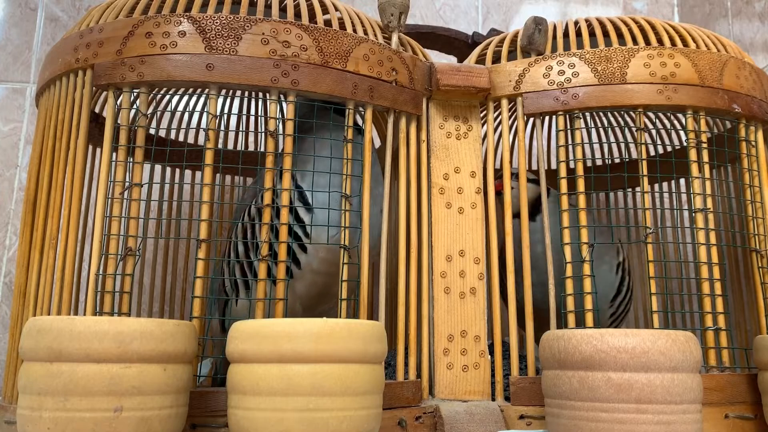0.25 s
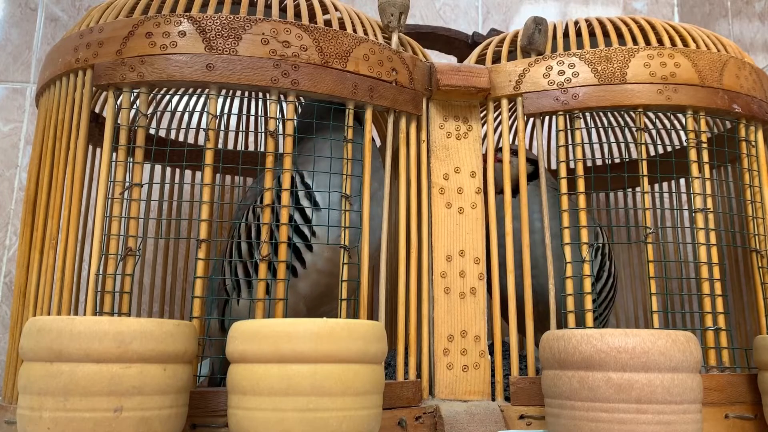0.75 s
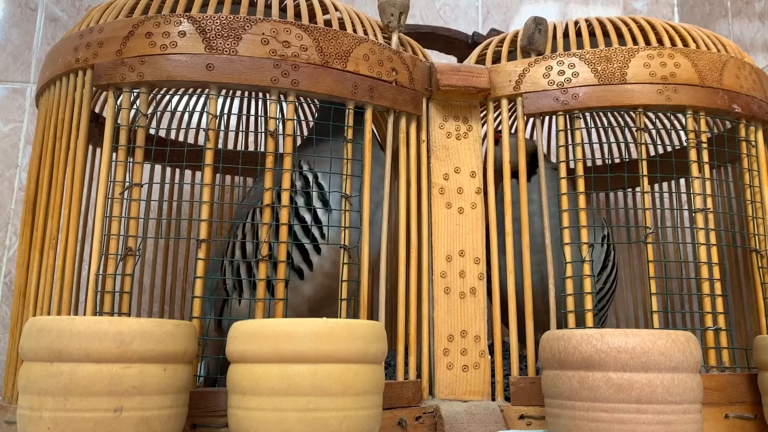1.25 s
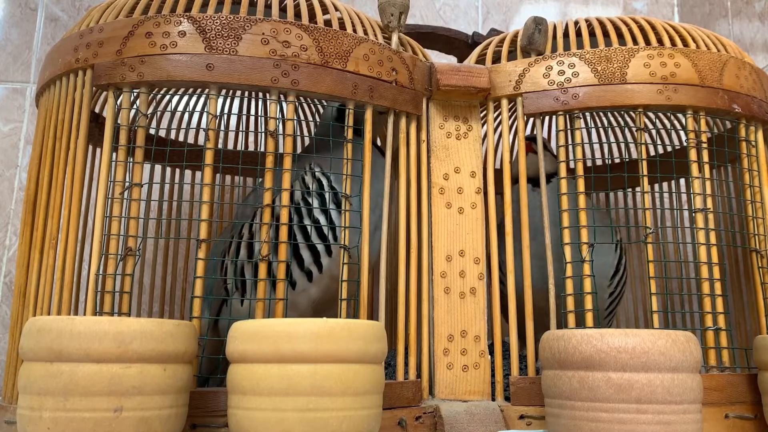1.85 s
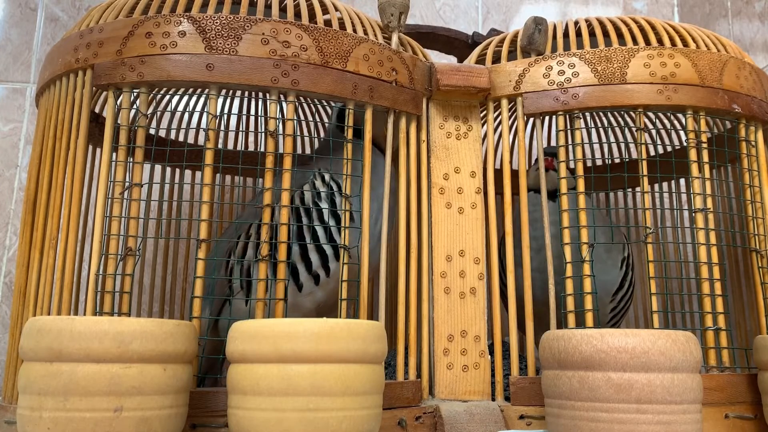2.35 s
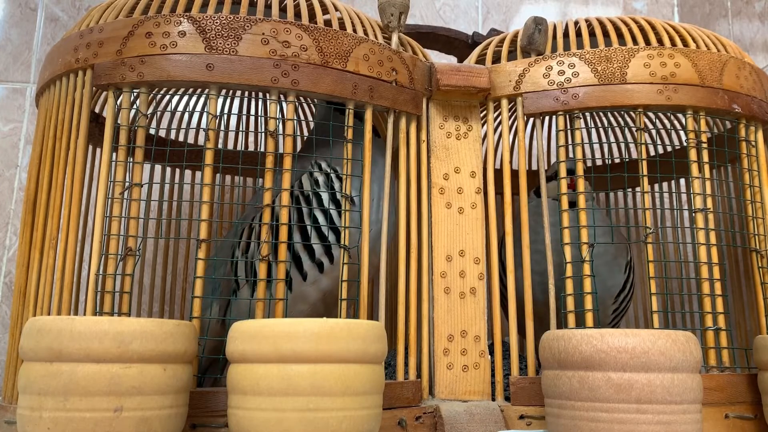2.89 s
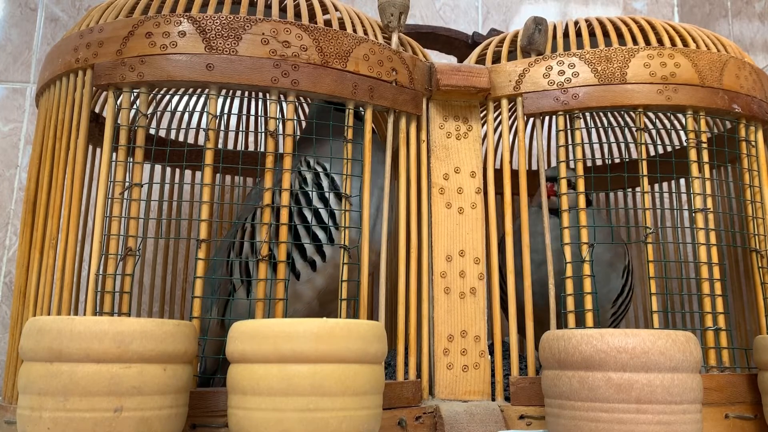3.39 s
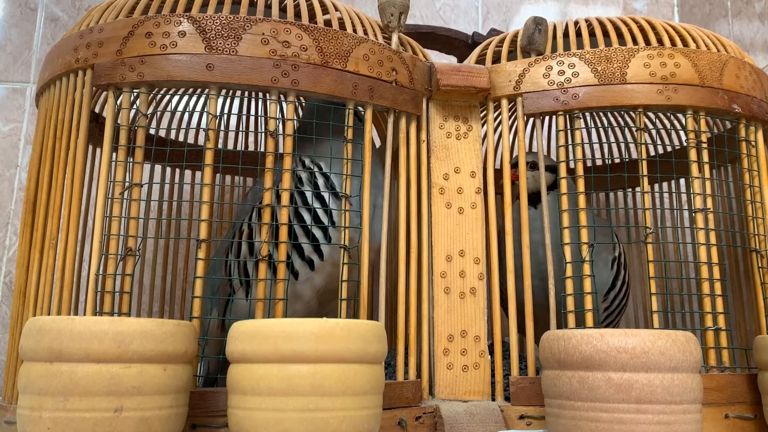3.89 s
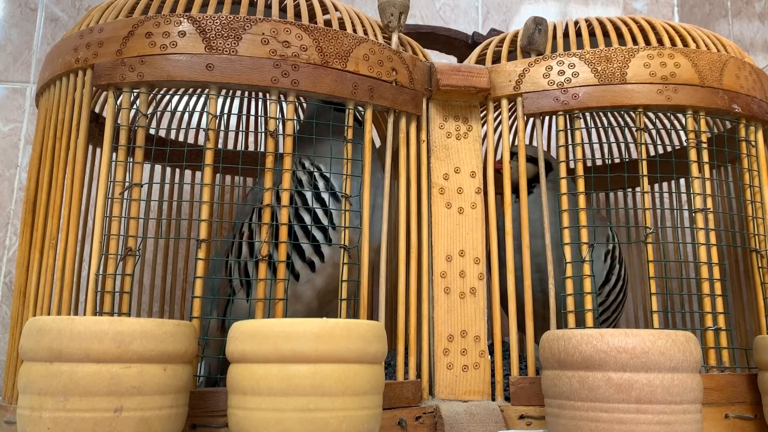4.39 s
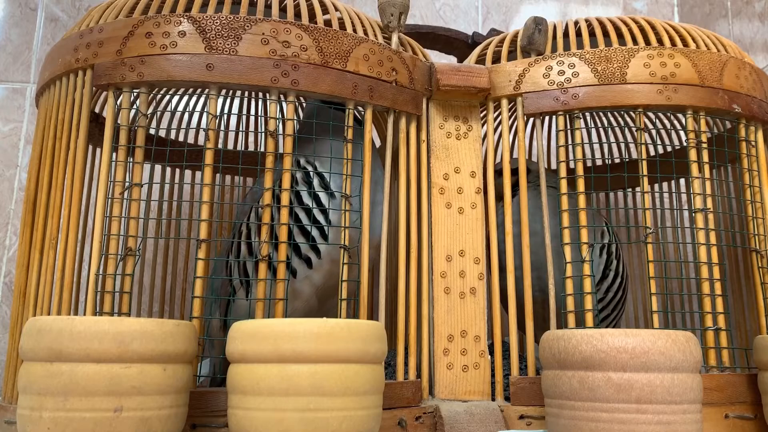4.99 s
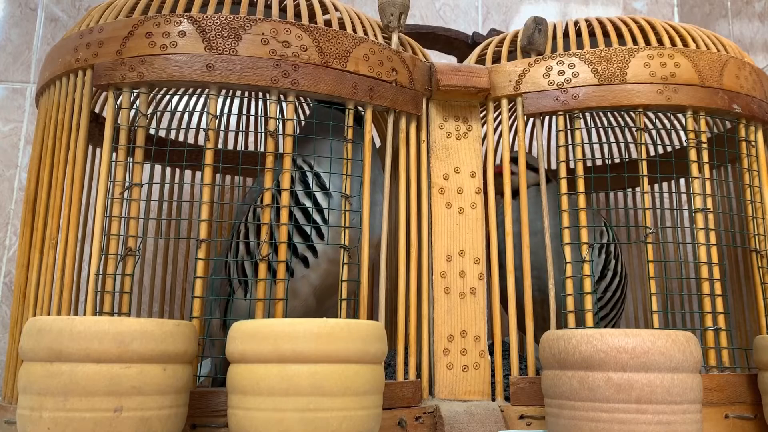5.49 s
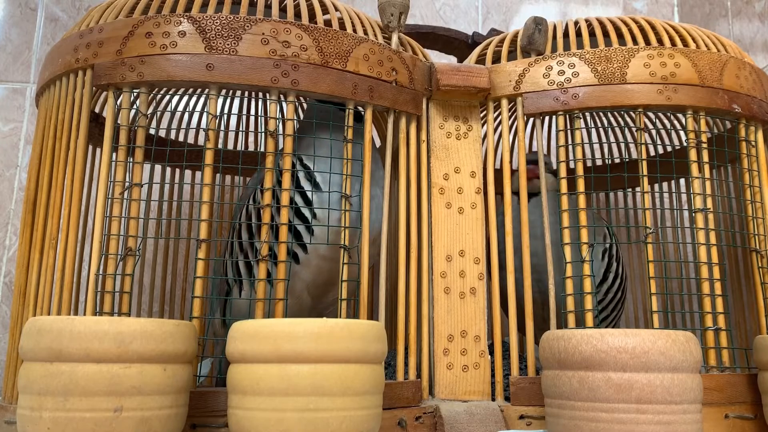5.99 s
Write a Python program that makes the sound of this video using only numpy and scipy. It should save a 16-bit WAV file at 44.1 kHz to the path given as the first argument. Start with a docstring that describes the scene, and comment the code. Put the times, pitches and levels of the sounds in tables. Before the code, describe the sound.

From the very start a caged partridge clucks close to the microphone, hoarse and nasal, five to six notes a second, with no real pause through about 6.25 seconds. Each cluck is one to a few quick throbs with woody, beaky resonance, often closing on a short low note that slides down. A second partridge gives near-clean, quavering short tones, most often in the first two seconds, then around 3.7, 5.25 and 5.6. A soft low knock comes at 0.25 and another at 2.0. Around 1.9 to 2.1 a ladder of clear pips climbs into a stronger cluck, and the calling grows louder. More pip runs come near 2.7, 4.3, 4.95 and, most densely, 5.8. From about 3.8 the breathy hiss is brighter as the head faces nearer. A hard-walled room rings after every note, over very faint low rumble.

```python
"""Hoarse clucks come first, five to six a second: throbbing pulse trains ring in throat and beak modes,
with a rush of coloured noise and often a falling low note; short clear pips climb into some or open them.
A second caged partridge answers in near-clean tones. Both are indoors, close to a two-port microphone.
A hard-walled room rings after them as decaying noise; low noise and two soft sine knocks lie underneath."""
import sys
import numpy as np
from scipy import signal
from scipy.fft import rfft, irfft, next_fast_len
from scipy.io import wavfile
from scipy.ndimage import uniform_filter1d, map_coordinates

SR = 44100
rng = np.random.default_rng(int(sys.argv[2]) if len(sys.argv) > 2 else 0)


def log_audio(samples):
    """Write samples as a 16-bit WAV file to the path given in sys.argv[1]."""
    # one column per channel
    frames = np.atleast_2d(samples).T
    # limit to full scale, then quantise
    limited = np.clip(frames, -1, 1)
    pcm = np.round(limited * 32767).astype(np.int16)
    wavfile.write(sys.argv[1], SR, pcm)


N = 275625


def amp(db):
    """Amplitude of a level in dB; amp(2 * db) is its power."""
    return 10 ** (np.asarray(db) / 20)


def unit(x):
    """Scales to rms 1."""
    return x / np.sqrt(np.mean(x ** 2) + 1e-20)


def along(points, hz):
    """Interpolates (hz, value) points on a log frequency axis."""
    f, v = np.transpose(points)
    return np.interp(np.log(hz + 1), np.log(f + 1), v)


def over_time(points):
    """Interpolates (time_s, value) points at every sample."""
    return np.interp(np.arange(N) / SR, *np.transpose(points))


def wobble(knots_per_s):
    """Smooth random curve through normal knots."""
    knots = rng.standard_normal(int(N * knots_per_s / SR) + 4)
    return map_coordinates(knots, [np.arange(N) * knots_per_s / SR])


def filtered(x, response):
    """Multiplies the spectrum by a response of frequency."""
    m = next_fast_len(N + SR // 2)
    return irfft(rfft(x, m) * response(np.fft.rfftfreq(m, 1 / SR)), m)[..., :N]


def modes(table):
    """Causal response of (hz, width_hz, level_db) resonances, alternating in sign."""
    def response(f):
        total = 0
        for k, (c, width, db) in enumerate(table):
            total = total + (-1) ** k * amp(db) * 1j * f * width / (c * c - f * f + 1j * f * width)
        return total
    return response


def noise(spectrum):
    """Gaussian noise coloured by (hz, level_db) points, rms 1."""
    return unit(filtered(rng.standard_normal(N), lambda hz: amp(along(spectrum, hz))))


def add(track, start_s, sound):
    """Mixes a sound into the track in place."""
    part = track[max(round(start_s * SR), 0):][:len(sound)]
    part += sound[:len(part)]


def swell(hold_s, rise, fall):
    """Time axis and envelope: fast rise, hold, exponential decay (rise and fall in s)."""
    t = np.arange(int((abs(hold_s) + 6 * fall) * SR)) / SR
    return t, (1 - np.exp(-(t / rise) ** 2)) * np.exp(-np.maximum(t - hold_s, 0) / fall)


# low noise levels: time_s, deep_db, hum_db (hum before an 8 dB cut)
RUMBLE_LEVELS = [(0.0, -68.5, -68), (1.781, -75.5, -70), (2.909, -67, -62), (6.25, -68.5, -71.5)]
# deep noise spectrum: hz, relative_db_per_hz
DEEP_SPECTRUM = [(20, -22), (40, 4), (60, 4), (90, 2.5), (110, -5), (140, -60.5)]


def rumble():
    """Wavering deep noise of the building and a narrow-band hum, nearly alike at both ports; faint air murmur."""
    time_s, deep_db, hum_db = np.transpose(RUMBLE_LEVELS)
    t = np.arange(N) / SR
    hum = noise([(75, -52.0), (90, -12.5), (96, 9.5), (104, -4.5), (120, -39.5)])
    waver = amp(1.5 * wobble(5))
    deep = amp(np.interp(t, time_s, deep_db)) * waver * noise(DEEP_SPECTRUM)
    shared = deep + amp(np.interp(t, time_s, hum_db) - 8.0) * hum
    air = [(30, -15.5), (70, -6.5), (130, -8.5), (250, -5.0),
           (1500, -12.0), (3000, -49.5), (6000, -71.5), (16000, -75)]
    return shared + amp(-75.0) * noise(air) + amp(-69.0) * np.array([noise(air), noise(air)])


# knocks: start_s, level_db, pitch_hz, t60_s
KNOCK_EVENTS = [(0.251, -55.5, 199, 0.2), (2.016, -56, 202, 0.17)]


def knocks():
    """Soft feet on the cage floor: decaying low sines with a softened onset."""
    out, t = np.zeros(N), np.arange(SR // 3) / SR
    for start_s, db, hz, t60_s in KNOCK_EVENTS:
        envelope = amp(db - 60 * t / t60_s) * (1 - np.exp(-t / 0.0039))
        add(out, start_s, envelope * np.sin(2 * np.pi * hz * t))
    return out


# phase between ports, from paths through the bars: hz, left_lead_rad
PORT_LEAD = [(300, 0), (355, 0), (395, 2.9), (460, 2.5), (620, 2), (700, .6), (850, 1.6), (1080, .7),
             (1130, 3.1), (1210, 3.9), (1280, 6.8), (1410, 7.1), (1480, 8.3), (1570, 9.9), (1800, 9.3),
             (1950, 12.4), (2150, 12.2), (2550, 12.4), (2800, 9.8), (4570, 12.6), (6300, 6.3),
             (15900, -6.3)]
# level between ports: hz, left_minus_right_db
PORT_TILT = [(380, -1.5), (700, 1), (2400, .4), (4400, 2), (8000, 0)]


def ports(x):
    """Splits a mono sound to two ports, half the phase lead and level difference to each side."""
    side = np.array([[.5], [-.5]])

    def response(hz):
        lead_rad = np.interp(hz, *np.transpose(PORT_LEAD))
        return amp(side * along(PORT_TILT, hz)) * np.exp(1j * side * lead_rad)
    return filtered(x, response)


# room decay: hz, t60_s
ROOM_DECAY = [(300, 0.64), (800, 0.89), (1400, 0.3), (2200, 0.92), (3000, 0.87), (6500, 0.5), (10000, 0.36),
              (15000, .21)]
# room power common to both ports: hz, share_0_to_1
ROOM_ALIKE = [(300, .8), (1000, .5), (1450, .35), (2000, .1), (6000, .1), (9000, .8)]
BARS_DB, BARS_T60_S = 5, .035  # quick scatter off the cage bars, relative to the room's start


def room(x):
    """Noise tails decay at each band's own t60; as the birds move, overlapping stretches get new tails."""
    out, size = np.zeros((3, N + 2 * SR)), SR // 4
    x = np.pad(x, (size, 0))
    for start in range(0, N + size, size):
        hz, t, z = signal.stft(rng.standard_normal((3, SR // 2)), SR, nperseg=256)
        wall_decay = amp(-60 * t / along(ROOM_DECAY, hz)[:, None])
        bar_decay = amp(BARS_DB - 60 * t / BARS_T60_S)
        tail = signal.istft(z * (wall_decay + bar_decay), SR, nperseg=256)[1]
        part = x[start:start + 2 * size]
        windowed = part * np.hanning(2 * size)[:len(part)]
        wet = signal.fftconvolve(windowed[None], tail / 60, axes=1)
        out[:, start + 250:][:, :wet.shape[1]] += wet  # 250 samples of delay
    out = out[:, size:size + N]
    share = lambda hz: np.clip(along(ROOM_ALIKE, hz), 0, 1)
    common = filtered(out[0], lambda hz: np.sqrt(share(hz)))
    separate = filtered(out[1:], lambda hz: np.sqrt(1 - share(hz)))
    return ports(common) + separate


# second bird: start_s, peak_after_s, length_s, first_hz, last_hz, level_db, air_db
ANSWER_NOTES = [(0.047, 0.028, 0.037, 660, 655, -32, -42), (0.139, 0.018, 0.048, 641, 604.7, -27.5, -44.5),
                (0.581, 0.041, 0.063, 677, 697, -31, -43.5), (0.788, 0.015, 0.042, 559, 552.4, -33, -57.5),
                (1.105, 0.02, 0.07, 679, 649, -33, -49), (1.324, 0.011, 0.051, 621, 530, -28.5, -54),
                (1.349, .04, 0.13, 722.4, 708.5, -34, -44.5), (1.906, 0.016, 0.034, 698.4, 724, -35.5, -65),
                (3.711, 0.013, 0.075, 638, 593, -30.5, -64), (5.249, 0.034, 0.069, 794, 667.5, -31, -52.5),
                (5.608, 0.0064, .08, 832.6, 498.7, -30.5, -61.5)]
# partials of its notes: multiple, level_db
ANSWER_PARTIALS = [(1, -2), (2, 4), (3, -21), (4, -33)]
ANSWER_RISE_DB, ANSWER_FADE_DB = 9.5, 6.5  # below the peak at start and end


def answers():
    """Near-clean harmonic tones, gliding in pitch, quavering in pitch and strength."""
    out = np.zeros(N)
    quaver, tremble_db = .025 * wobble(110), 3 * wobble(70)
    for start_s, peak_s, length_s, first_hz, last_hz, db, _ in ANSWER_NOTES:
        t = np.arange(0, length_s, 1 / SR)
        at = ((start_s + t) * SR).astype(int)
        glide_hz = first_hz + (last_hz - first_hz) * t / length_s
        phase = 2 * np.pi * np.cumsum(glide_hz * (1 + quaver[at])) / SR
        edge = np.clip(np.minimum(t, length_s - t) / 0.0077, 0, 1)
        tone = sum(amp(level) * np.sin(k * phase) for k, level in ANSWER_PARTIALS)
        shape_db = np.interp(t, [0, peak_s, length_s], [-ANSWER_RISE_DB, 0, -ANSWER_FADE_DB])
        add(out, start_s, edge * amp(db + shape_db + tremble_db[at]) * tone)
    return out


# pips: start_s, level_db (1.5 dB added in play), second_partial_hz, upper_partial_relative_db
PIP_NOTES = [(0.474, -29, 672, -17), (0.911, -30.5, 1033, -19), (0.94, -27.5, 998, -29),
             (1.164, -32, 670, -5), (1.358, -24.5, 1024, -4.5), (1.516, -24, 686, -3.5),
             (1.706, -25.5, 702, 0.5), (1.925, -25, 713, -19.5), (1.955, -30, 727, -12.5),
             (1.976, -36.5, 710, -6), (2.018, -28.5, 699, -3), (2.026, -29.5, 1011, -18),
             (2.046, -28.5, 656, -7), (2.068, -24.5, 718, -13.5), (2.088, -28.5, 989, -9),
             (2.107, -19.5, 995, -25), (2.652, -27.5, 712, -12), (2.682, -27.5, 744, -9.5),
             (2.706, -26.5, 695, -12.5), (2.727, -22, 969, -14), (3.25, -26.5, 711, -3),
             (3.273, -27, 986, -21), (3.49, -30.5, 659, -9), (4.182, -27, 659, -9),
             (4.318, -26, 678, -12.5), (4.347, -26, 1013, -13.5), (4.935, -24.5, 708, -14),
             (4.964, -29.5, 694, -6.5), (4.99, -22, 899, -19), (5.013, -23, 948, -11.5),
             (5.204, -39.5, 706, 7.5), (5.338, -26, 712, -10), (5.381, -17, 976, -13),
             (5.757, -26.5, 1009, -25.5), (5.76, -33, 703, 4.5), (5.793, -25, 802, -8),
             (5.82, -20.5, 967, -10.5), (5.842, -19.5, 1000, -18.5), (5.865, -22, 939, -5.5),
             (5.881, -23, 905, -19), (6.236, -24, 918, -10)]
PIP_RISE_S, PIP_HOLD_S, PIP_FALL_S = 0.0067, 0.0087, 0.0034
PIP_SAG = 0.017  # share of pitch lost over the hold
RING_HZ = 1400  # the beak favours the partial nearest to this


def pips():
    """Each pip is a brief sagging tone plus one upper partial that rings in the beak."""
    out = np.zeros(N)
    t, shape = swell(PIP_HOLD_S, rise=PIP_RISE_S, fall=PIP_FALL_S)
    sagging_t = t + PIP_SAG * t * (1 - t / (2 * PIP_HOLD_S))
    phases = rng.standard_normal(size=(len(PIP_NOTES), 2))
    for (start_s, db, hz, ring_db), (tone_rad, ring_rad) in zip(PIP_NOTES, phases):
        phase = 2 * np.pi * hz * sagging_t + tone_rad
        ratio = round(2 * RING_HZ / hz) / 2  # halves, as hz is the second partial
        tone = np.sin(phase) + amp(ring_db) * np.sin(ratio * phase + ring_rad)
        add(out, start_s - .007, amp(db + 1.5) * shape * tone)
    return out


# clucks: first_throb_s, span_to_last_throb_s, first_db, last_db, chest_share_db, tip_first_db, tip_last_db,
# air_db, low_note_db (-70 = none)
CLUCK_CALLS = [(.007, .0052, -36, -33, -8, 6, 2, -64, -51.5),
               (.105, .026, -26, -25, -14.5, -3.5, -0.5, -50, -51),
               (.274, .05, -27.5, -28, -9, 2, 3, -46.5, -40.5),
               (.481, .018, -26, -23.5, -13, 0, 0, -50.5, -41),
               (.649, .024, -21, -28, -13, -1, 2.5, -48.5, -42),
               (0.813, 0.028, -28, -30, -8.5, 6.5, -4, -50, -70),
               (.978, .052, -30.5, -27.5, -9.5, 0, -2, -50.5, -41),
               (1.171, .029, -21, -27, -8, 1.5, 7, -41.5, -40),
               (1.332, 0.0099, -27, -30, -8, -9, -8, -44.5, -70),
               (1.446, .033, -31, -29.5, -8, 1.5, -0.5, -52.5, -70),
               (1.523, .044, -27, -28.5, -10, 5, 0, -42, -41.5),
               (1.718, .054, -23.5, -30.5, -9.5, 1, 3, -44, -43),
               (1.909, 0.016, -27, -29, -3.5, -2.5, -4, -45.5, -70),
               (2.137, .022, -17.5, -19.5, -13.5, -7.5, 0.5, -39.5, -42),
               (2.313, .024, -29.5, -24, -21, 3.5, 5, -39.5, -70),
               (2.368, .028, -24, -21, -9.5, 0.5, 0, -40, -44),
               (2.541, .014, -23, -23.5, -6, -6.5, -10.5, -43.5, -54),
               (2.758, .022, -18, -24.5, -23.5, -3.5, 2.5, -39, -43.5),
               (2.938, .033, -24, -24, -11, 2.5, 2.5, -46, -39),
               (3.121, .021, -18.5, -19, -14.5, -11, -3, -45.5, -48),
               (3.307, .026, -21.5, -18, -13.5, -13, -4, -43, -40),
               (3.497, .058, -19, -25.5, -15, 0, 3, -41.5, -37.5),
               (3.702, .027, -17, -26, -13, -5, -2.5, -42.5, -49),
               (3.811, .028, -27.5, -23, -10.5, -4, 6, -36, -39),
               (4.013, .026, -25, -23, -13, 0.5, 1.5, -37.5, -39.5),
               (4.189, .034, -21, -29, -9, -1.5, 5, -43, -50),
               (4.382, .046, -20.5, -19.5, -13, -1.5, 3, -38, -38.5),
               (4.586, .083, -21.5, -23.5, -20.5, 5, 4, -41, -40.5),
               (4.812, .018, -16.5, -22.5, -10, -3, -3.5, -43, -54.5),
               (5.033, .045, -26.5, -18, -20.5, 5, -5, -38.5, -37.5),
               (5.234, 0.017, -26, -25.5, -22.5, -3, 3, -44.5, -70),
               (5.408, .05, -24.5, -17.5, -22, 8.5, -8, -40, -45.5),
               (5.617, .025, -28, -29, -26.5, 3.5, 6, -41, -70),
               (5.886, .046, -27, -17.5, -14, 8, -1.5, -32, -38.5),
               (6.106, .022, -27, -22.5, -8, 5.5, 2, -37.5, -43),
               (6.246, .0088, -36.5, -36, -4, -0.5, 0, -54, -70)]
# soft throbs before some clucks: first_throb_s, span_to_last_throb_s, first_db, last_db, air_db
LEAD_IN_CALLS = [(0.916, 0.082, -40, -27.5, -61.5), (2.029, .088, -42.5, -31, -60),
                 (2.655, 0.085, -41.5, -29.5, -58), (4.324, 0.044, -31.5, -32, -55),
                 (4.937, 0.08, -38.5, -35.5, -64), (5.766, 0.1, -42, -31.5, -52.5)]
THROAT_DB = -9.5  # throat share in a cluck
LEAD_CHEST_DB, LEAD_THROAT_DB = (-6.5, -3), (-1.5, -8.5)  # lead-in shares at first and last throb
LEAD_TIP_DB = 3.5


def trains():
    """Lists calls: start_s, span_s, then (first, last) dB of level, chest share, throat share, tip mode."""
    calls = []
    for s, span, first, last, chest, tip_first, tip_last, *_ in CLUCK_CALLS:
        calls.append((s, span, (first, last), (chest, chest), (THROAT_DB, THROAT_DB), (tip_first, tip_last)))
    for s, span, first, last, _ in LEAD_IN_CALLS:
        calls.append((s, span, (first, last), LEAD_CHEST_DB, LEAD_THROAT_DB, (LEAD_TIP_DB, LEAD_TIP_DB)))
    return calls


FALL_EARLY_S, FALL_S = .024, 0.041  # low note: lead on the last throb, nominal length


def low_notes():
    """(start_s, level_db) of the falling low note that closes most clucks."""
    return [(max(s + max(span - FALL_EARLY_S, 0), 0), db) for s, span, *_, db in CLUCK_CALLS if db > -65]


REST_HZ, TENSE_HZ = 321, 484.9  # pitch with slack and with fully tight membranes


def pitch():
    """Membranes tighten toward each closing low note and slacken as the pressure drops."""
    t, tension = np.arange(N) / SR, np.zeros(N)
    for s, _ in low_notes():
        near = slice(max(int(s * SR) - SR // 6, 0), int(s * SR) + SR // 6)
        rise = 1 / (1 + np.exp((s - .03 - t[near]) / .016))
        drop = 1 / (1 + np.exp((t[near] - s - .8 * FALL_S) / .009))
        tension[near] = np.maximum(tension[near], rise * drop)
    return REST_HZ + (TENSE_HZ - REST_HZ) * tension


# low note, level change from top to end: time_s, change_db
LOW_NOTE_FADE = [(0, 8), (2.5, 2.5), (3.6, -9), (4.6, -13.5), (6.25, -17)]
SLACK_SAG, SLACK_DULL = .04, 4  # extra pitch loss when slack; overtone loss exponent


def falls():
    """The fundamental sounds clear while the pitch slides down and the overtones dull."""
    level, hz = np.zeros(N), pitch()
    for s, db in low_notes():
        add(level, s - .006, amp(db) * swell(FALL_S + .008, rise=.008, fall=.01)[1])
    tension = hz / TENSE_HZ
    slack = (TENSE_HZ - hz) / (TENSE_HZ - REST_HZ)
    sounding_hz = hz * (.96 - SLACK_SAG * slack + 0.01507 * wobble(60))
    phase = 2 * np.pi * np.cumsum(sounding_hz) / SR
    fundamental = amp(over_time(LOW_NOTE_FADE) * (slack - .5)) * np.sin(phase)
    overtones = amp(4.5) * np.sin(2 * phase) + amp(14.5) * np.sin(3 * phase)
    return level * (fundamental + tension ** SLACK_DULL * overtones)


def syrinx(pitch_hz, jitter, rough):
    """Uneven pulses, strong and weak in turn, mixed with noise let through once a cycle."""
    phase = np.cumsum(pitch_hz * (1 + jitter * wobble(120))) / SR
    cycle = np.floor(phase)
    strength_db = 4.5 * np.cos(np.pi * cycle) + 1.5 * wobble(200)
    pulses = np.diff(cycle, prepend=0) * amp(strength_db)
    gate = np.exp(-4 * (phase % 1))
    return (1 - rough) * unit(pulses) + rough * unit(gate * rng.standard_normal(N))


THROB_S = .026  # nominal spacing
THROB_RISE_S, THROB_FALL_S = .010, .0145  # widths of the two sides
ARCH_DB, UNEVEN_DB, SHARE_SCATTER_DB = 1, 1.35, 2.5  # mid-call swell; random scatter of level, of shares


def throbs():
    """Power fed to chest, throat, beak and tip modes: bell-shaped swells, evenly spread over each call."""
    power, calls = np.zeros((4, N)), trains()
    t = np.arange(-2 * THROB_FALL_S, 2 * THROB_FALL_S, 1 / SR)
    bell = np.exp(-4 * (t / np.where(t < 0, THROB_RISE_S, THROB_FALL_S)) ** 2)
    chances = rng.standard_normal(size=(len(calls), 6, 3))
    for (start_s, span_s, *ends), chance in zip(calls, chances):
        places = np.linspace(0, 1, round(span_s / THROB_S) + 1)
        for u, scatter in zip(places, chance * [UNEVEN_DB, SHARE_SCATTER_DB, SHARE_SCATTER_DB]):
            levels_db = [a + (b - a) * u for a, b in ends] + np.append(scatter, 0)
            db, chest_db, throat_db, tip_db = levels_db
            chest, throat = amp(2 * chest_db), amp(2 * throat_db)
            beak = max(1 - chest - throat, .03)  # what the two lower groups leave
            shares = np.array([chest, throat, beak, beak * amp(2 * tip_db)])
            s = start_s + u * span_s - 2 * THROB_FALL_S - .003
            throb = amp(2 * (db + ARCH_DB * np.sin(np.pi * u))) * bell
            for track, share in zip(power, shares):
                add(track, s, (share * throb)[max(round(-s * SR), 0):])
    return power


AIR_EARLY_S, AIR_LATE_S = 0.012, 0.0024  # cluck air leads the first throb, outlasts the last
AIR_CREST_DB = 9.5  # air peaks over mean strength
PIP_AIR_DB = -31  # pip air relative to the pip's table level


def puffs():
    """Strength of the rush of air under each call, clear note and pip."""
    level = np.zeros(N)
    rows = [(s - AIR_EARLY_S, span + AIR_EARLY_S + AIR_LATE_S, db) for s, span, *_, db, _ in CLUCK_CALLS]
    rows += [(s - AIR_EARLY_S, span + 2 * AIR_EARLY_S, db) for s, span, *_, db in LEAD_IN_CALLS]
    rows += [(s + 0.015, 0.68 * length, db) for s, _, length, *_, db in ANSWER_NOTES]
    for s, hold_s, db in rows:
        add(level, s - .005, amp(db - AIR_CREST_DB) * swell(hold_s, rise=0.013, fall=0.0086)[1])
    pip_shape = swell(PIP_HOLD_S, rise=PIP_RISE_S, fall=PIP_FALL_S)[1]
    for s, db, *_ in PIP_NOTES:
        add(level, s - .007, amp(db + PIP_AIR_DB - AIR_CREST_DB) * pip_shape)
    return level


def patchy(x):
    """Stretches of the spectrum swell and fade as the beak moves."""
    z = signal.stft(x, nperseg=512)[2]
    across_hz = uniform_filter1d(rng.standard_normal(z.shape), 5, 0)
    field = uniform_filter1d(across_hz, 12, 1)
    return unit(signal.istft(z * amp(3.5 * unit(field)), nperseg=512)[1][:N])


# head turned to the microphone: time_s, facing_0_to_1
HEAD_FACING = [(0, 0.04), (2.9, 0), (3.298, 0.8), (3.603, 0), (3.799, 0.98), (6.25, 0.81)]
# lower air band, relative to the upper: time_s, level_db
AIR_LOW_LEVEL = [(0, -13.5), (1, -5.5), (2.4, -8.5), (3.25, 0.5), (3.62, -7.5), (4.399, -1.5), (5.401, 1.5),
                 (6.201, -8)]
# air spectra (upper band; lower band, head away; lower band, head near): hz, relative_db_per_hz
AIR_HIGH_SPECTRUM = [(7000, -61), (7700, -25), (8700, -27.5), (9500, -6.5), (10500, -0.5), (12000, -0.5),
                     (13500, 3.5), (15000, 2.5), (15800, -16)]
AIR_AWAY_SPECTRUM = [(3200, -46), (3600, -22), (4400, -14.5), (5200, -8.5), (5700, 5), (6300, -7),
                     (6900, -9.5), (7400, -37.5), (9000, -89.5)]
AIR_NEAR_SPECTRUM = [(2900, -40), (3300, -19), (4300, -12), (4750, -3), (5350, 0), (5900, -4), (6300, -14),
                     (6800, -45), (9000, -90)]


def rush(power, facing):
    """Two bands of noise flow past the beak and pulse with the throbs."""
    high = puffs()
    low = amp(over_time(AIR_LOW_LEVEL)) * high
    away = np.sqrt(1 - facing) * noise(AIR_AWAY_SPECTRUM)
    lower = away + np.sqrt(facing) * noise(AIR_NEAR_SPECTRUM)
    effort = power[:3].sum(axis=0) + amp(-74.5)
    pulsing = (effort / np.abs(uniform_filter1d(effort, size=SR // 25))) ** .28
    flutter = pulsing * amp(2.5 * wobble(50))
    return flutter * (high * patchy(noise(AIR_HIGH_SPECTRUM)) + low * patchy(lower))


# resonances (chest, throat, beak, beak tip): hz, width_hz, relative_db
CHEST_MODES = [(708, 185, 15.5), (523, 11, -12)]
THROAT_MODES = [(1034, 36, -3), (944, 40, -13)]
BEAK_MODES = [(1135, 159, -7.5), (1296, 151.5, 0)]
TIP_MODES = [(1521.5, 78.5, 13), (1932, 280, -4)]
# heard while the head is turned away: hz, width_hz, relative_db
SIDE_MODES = [(1710, 180, 0)]
SIDE_DB = -15  # relative to the beak
# upper modes of the open beak: hz, width_hz, relative_db
GAPE_MODES = [(1901, 81, 6), (2157, 190, 2), (2473, 31, 4), (2884, 120, -5.5)]
# upper modes as the beak opens: time_s, level_change_db
BEAK_OPENING = [(0, 9.5), (.4, 7.5), (.8, 4.5), (1.2, 7.5), (1.55, 2), (1.9, -8), (2.2, -9), (2.55, -.5),
                (2.9, 6.5), (3.2, -8), (3.5, 4), (3.8, 2.5), (4.1, 6), (4.4, 4), (4.65, 4), (4.85, -1.5),
                (5.1, 1.5), (5.4, -5), (5.65, 2.5), (5.9, 8), (6.2, 1)]
# gain laid over all modes: hz, gain_db
VOICE_ROLL_OFF = [(250, -37), (500, 19.5), (1600, 1.5), (2000, -15.5), (2950, -13), (3300, -19),
                  (6000, -69)]


def clucks():
    """Throb power gates one rough buzz through six groups of modes; air rushes with it."""
    buzz = syrinx(pitch(), jitter=.018, rough=.08)
    power = throbs()
    facing = np.clip(over_time(HEAD_FACING), 0, 1)
    aside = power[2] * (1 - facing) * amp(2 * SIDE_DB)
    # the upper modes beam forward
    upper = power[2] * amp(2 * (-33.75 + 5.5 * facing + over_time(BEAK_OPENING)))
    tables = (CHEST_MODES, THROAT_MODES, BEAK_MODES, TIP_MODES, SIDE_MODES, GAPE_MODES)
    voice = 0
    for track, table in zip((*power, aside, upper), tables):
        tract = lambda hz: modes(table)(hz) * amp(along(VOICE_ROLL_OFF, hz))
        voice = voice + filtered(np.sqrt(track) * buzz, tract) / np.std(filtered(buzz, tract))
    return voice + rush(power, facing)


def scene():
    """Sums the birds, direct and through the room, over knocks and rumble."""
    birds = clucks() + falls() + answers() + pips()
    return amp(-0.19) * ports(birds) + amp(-1.5) * room(birds) + knocks() + rumble()


TOP_HZ = 15830


def record(dry):
    """The recorder keeps nothing at or above its band limit."""
    return filtered(dry, lambda hz: hz < TOP_HZ)


dry = scene()
out = record(dry)
log_audio(out)
```